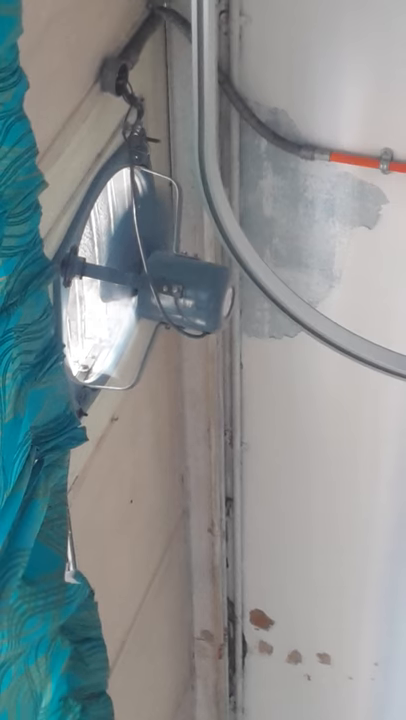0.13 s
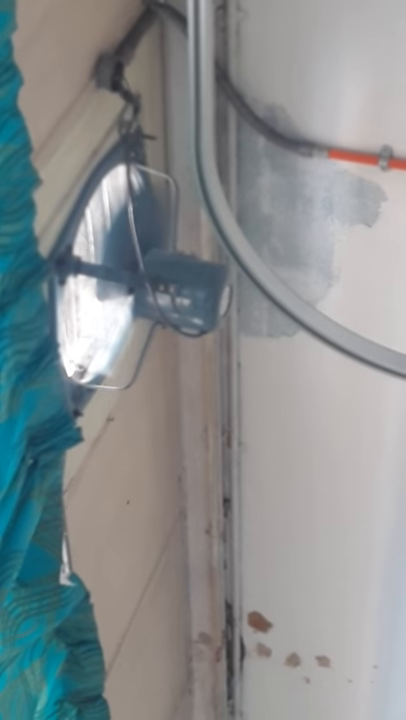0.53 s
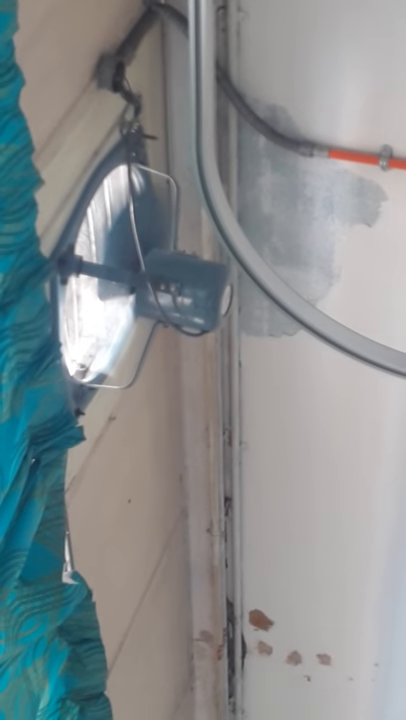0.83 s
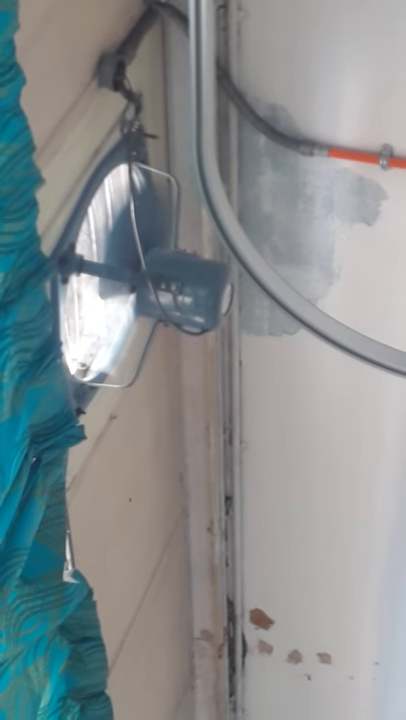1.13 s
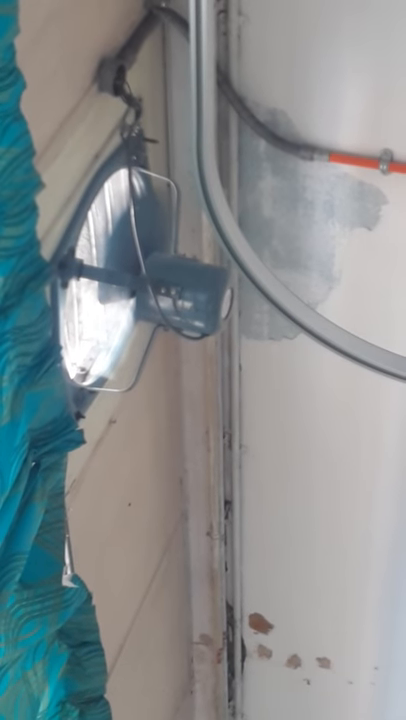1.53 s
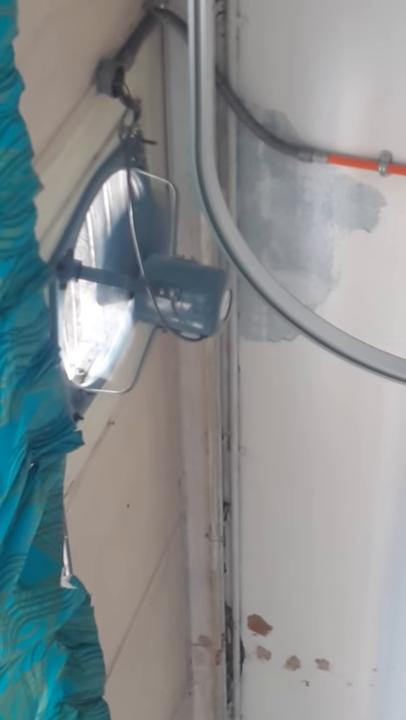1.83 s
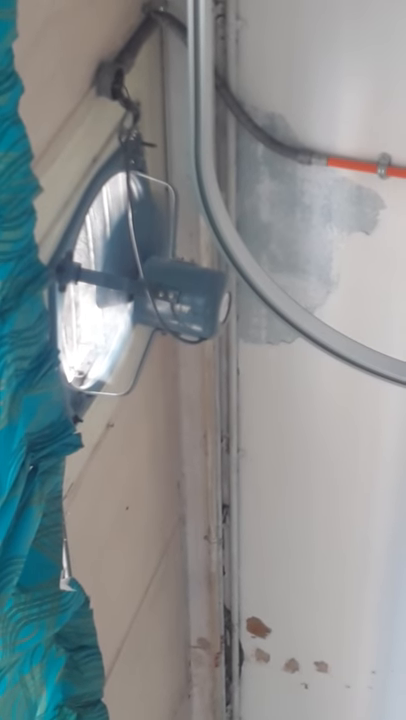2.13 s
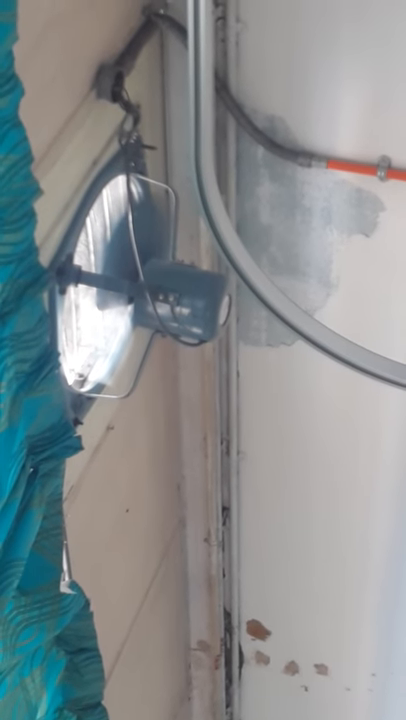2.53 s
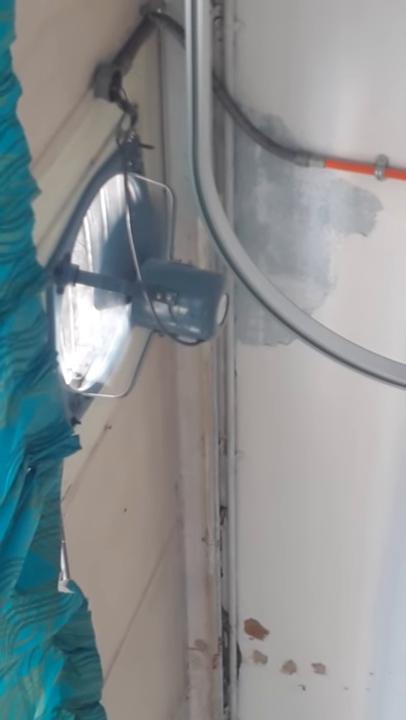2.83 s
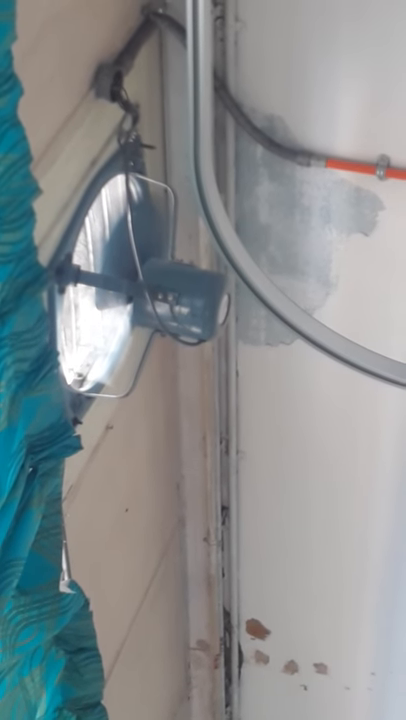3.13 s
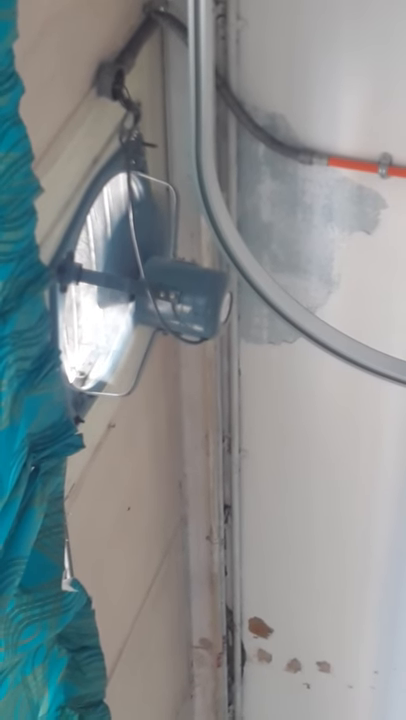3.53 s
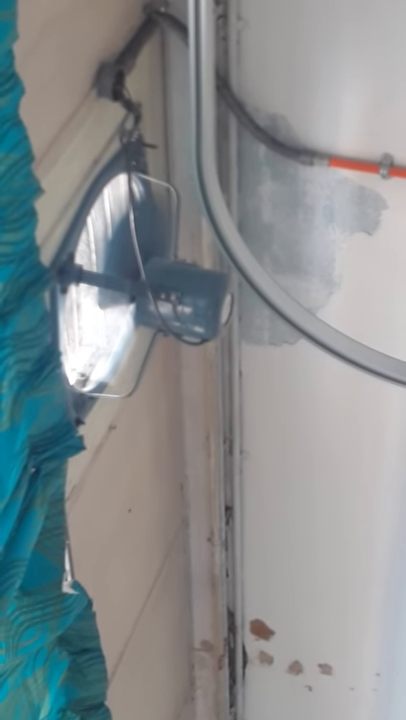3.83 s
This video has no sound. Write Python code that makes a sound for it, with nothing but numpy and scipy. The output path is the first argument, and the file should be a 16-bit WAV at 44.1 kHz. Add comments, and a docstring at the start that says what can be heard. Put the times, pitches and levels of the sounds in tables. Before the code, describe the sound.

Loud fan noise, rushing air and low hum, with fast metallic chatter and one brief knock.

```python
"""In a hard-walled room a small metal exhaust fan runs as the sound fades in: turbulent air, blade and mains
hum and a singing bearing, made of shaped noise, wavering tones and noise-driven resonances. Once a turn the
rotor scrapes and chatters against its housing, as grain under contact pressure, and the housing rings in the
treble. A hissing puff comes at 0.9 s; gusts and squeals come and go throughout. At 2.2 s one knock on the left
microphone, a filtered pressure step, makes the limiter duck."""
import sys
import numpy as np
from scipy import signal
from scipy.fft import rfft, irfft
from scipy.io import wavfile
from scipy.ndimage import uniform_filter1d, minimum_filter1d

SR = 44100
rng = np.random.default_rng(int(sys.argv[2]) if len(sys.argv) > 2 else 0)


def inscribe(sig):
    """Save sig as 16-bit PCM at rate SR to the path in sys.argv[1].

    A 1-D sig is mono; a 2-D sig holds one channel per row.
    Samples are clipped to [-1, 1] before scaling.
    """
    pcm = np.round(np.clip(np.atleast_2d(sig).T, -1, 1) * 32767)
    wavfile.write(sys.argv[1], SR, pcm.astype(np.int16))


N = 176400   # samples: 4 s

TURN_S, FIRST_TURN_S = .042137, .3299   # rotation period, start of the first scraping turn


def from_db(db):
    """Level to amplitude: 20 dB is a factor of ten."""
    return 10 ** (np.asarray(db) / 20)


def rms_one(x):
    """Normalisation to unit rms, so that a later gain sets the level."""
    return x / np.sqrt(np.mean(x ** 2) + 1e-20)


def at_hz(points, hz):
    """Interpolation on a logarithmic frequency axis."""
    point_hz, values = np.transpose(points)
    return np.interp(np.log(np.maximum(hz, 1)), np.log(point_hz), values)


def bell(x, width):
    """Gaussian hump of height 1 around zero."""
    return np.exp(-(x / width) ** 2)


def humps(rows, width_s):
    """Superposition in dB: one Gaussian swell for each row."""
    t = np.arange(N) / SR
    return sum(db * bell(t - at_s, width_s) for at_s, db in rows)


def drift(rate_hz):
    """Random wander of unit rms: low-passed noise, computed at every 40th sample and interpolated."""
    pole = np.exp(-2 * np.pi * rate_hz * 40 / SR)
    noise = rng.standard_normal(N // 40 + 2002)
    slow = signal.lfilter([1], [1, -2 * pole, pole * pole], noise)[2000:]   # drop the filter's start-up
    return np.interp(np.arange(N) / 40, np.arange(len(slow)), rms_one(slow))


def colour(x, spectrum):
    """Linear filtering: multiply by a spectrum, then normalise to rms 1."""
    gain = from_db(at_hz(spectrum, np.fft.rfftfreq(N, 1 / SR)))
    return rms_one(irfft(rfft(x) * gain, N))


def ring(drive, mode):
    """Damped resonance: a pole pair set by frequency and decay, with its own level in each channel."""
    hz, left_db, right_db, t60_s = mode
    radius = np.exp(-np.log(1000) / (t60_s * SR))   # falls 60 dB in t60
    angle = 2 * np.pi * hz / SR
    ringing = signal.lfilter([1, 0, -1], [1, -2 * radius * np.cos(angle), radius * radius], drive)
    return from_db([[left_db], [right_db]]) * rms_one(ringing)


# spectrum of the rushing air: (frequency [Hz], relative density [dB per Hz])
AIR_SPECTRUM = [(20, -30), (40, -24), (60, -10.5), (80, -12), (100, -6), (160, -4), (270, .5), (340, -4.5),
                (420, -7), (500, -3.5), (650, -6), (760, -3), (900, -7), (1020, -5), (1150, -9), (1350, -8),
                (1550, -14), (2200, -13.5), (4500, -12), (7000, -12), (11000, -20.5), (15500, -26)]
# likeness of the rush at the two ears: (frequency [Hz], left-right correlation [-1 to 1])
EAR_CORRELATION = [(40, 1), (120, 0.85), (250, 0.89), (600, 0.49), (1100, 0.2), (3000, 0.15), (12000, 0)]
# stereo balance of rush and hum: (frequency [Hz], left minus right [dB])
AIR_PAN = [(60, 0), (250, -3.5), (600, 0.5), (1200, -3), (2400, -2), (5000, 0), (13000, -8)]
# gusts in the middle of the rush: (time [s], swell [dB])
GUSTS = [(.64, 1.5), (.99, 5), (1.35, 2.5), (1.56, 2.5), (1.77, 3.5), (1.94, 3.5), (2.09, 2.5), (2.37, 4.5),
         (2.51, 6.5), (2.73, 1), (2.9, 3), (3.13, 3.5), (3.45, 1.5), (3.52, 2.5), (3.72, 3), (3.9, 2)]
GUST_WIDTH_S, LULL_DB = 0.031, -1.4   # length of a gust; level between gusts
AIR_DB, AIR_PATCHY_DB, AIR_FLUTTER_DB = -28, 1.23, 1.09   # level; spread per octave, spread in common
ROAR_HZ, ROAR_OCTAVES, ROAR_FLUTTER_DB = 885, 2, 0.6   # the middle of the rush swells most
PUFF_S, PUFF_WIDTH_S, PUFF_HZ, PUFF_OCTAVES, PUFF_DB = 0.892, .035, 4060, 1.3, 4   # one hissing puff


def air():
    """Turbulence: partly correlated noise in octave bands that flutter together and flicker on their own."""
    t, hz = np.arange(N) / SR, np.fft.rfftfreq(N, 1 / SR)
    alike = np.clip(at_hz(EAR_CORRELATION, hz), -1, 1)
    mid, side = rfft(rng.standard_normal((2, N)))
    ears = np.array([[1], [-1]])
    noise = np.sqrt(1 + alike) * mid + ears * np.sqrt(1 - alike) * side
    rush = noise * from_db(at_hz(AIR_SPECTRUM, hz) + ears * at_hz(AIR_PAN, hz) / 2)
    octave = np.round(np.log2(np.maximum(hz, 64)))
    flutter_db = AIR_FLUTTER_DB * drift(47)
    roar_db = LULL_DB + humps(GUSTS, GUST_WIDTH_S) + ROAR_FLUTTER_DB * drift(45)
    puff_db = PUFF_DB * bell(t - PUFF_S, PUFF_WIDTH_S)
    out = 0
    for k in np.unique(octave):
        roar_part_db = roar_db * bell(k - np.log2(ROAR_HZ), ROAR_OCTAVES)
        puff_part_db = puff_db * bell(k - np.log2(PUFF_HZ), PUFF_OCTAVES)
        patchy_db = AIR_PATCHY_DB * drift(12.6)
        band = irfft(rush * (octave == k), N)
        out = out + band * from_db(flutter_db + roar_part_db + puff_part_db + patchy_db)
    return from_db(AIR_DB) * rms_one(out)


# hum on or near harmonics of the turning rate: (multiple of the turning rate, level [dB])
BLADE_HUM = [(5, -48.5), (6, -42), (7, -41), (8, -42.5), (9, -42), (12, -50), (16, -49.5), (20, -46),
             (21, -55), (22.2, -49), (57, -53.5)]
MAINS_HZ, MAINS_DB = 100, -45
HUM_WAVER = 0.29   # random part relative to the steady tone, in each quadrature


def hum():
    """Periodic forcing: blade and mains tones, each wavering slightly in amplitude and phase."""
    t, out = np.arange(N) / SR, 0
    tones = [(multiple / TURN_S, db) for multiple, db in BLADE_HUM] + [(MAINS_HZ, MAINS_DB)]
    for hz, db in tones:
        waver = 1 + HUM_WAVER * (drift(4.1) + 1j * drift(4.4))
        carrier = np.exp(2j * np.pi * (hz * t + rng.random()))
        tone = rms_one(np.real(waver * carrier))
        out = out + tone * from_db(db + at_hz(AIR_PAN, hz) * np.array([[.5], [-.5]]))
    return out


# resonances of the bearing: (frequency [Hz], left level [dB], right level [dB], decay time t60 [s])
BEARING_MODES = [(6360, -43, -47, 0.049), (8600, -53, -41, 0.069), (9930, -46, -39, 0.03)]
# flares in the drive of the lowest bearing resonance: (time [s], swell [dB])
SQUEALS = [(.73, 4), (.96, 9.5), (1.75, 3), (2.14, 4), (2.39, 12), (3.12, 9)]
SQUEAL_WIDTH_S = 0.067
BEARING_WANDER_DB, BEARING_WANDER_HZ = 1.5, 8.7   # spread and rate of each resonance's own swelling


def bearing():
    """Friction-driven resonance: uneven friction keeps a few modes singing; the lowest flares now and then."""
    swells_db = [BEARING_WANDER_DB * drift(BEARING_WANDER_HZ) for _ in BEARING_MODES]
    swells_db[0] = swells_db[0] + humps(SQUEALS, SQUEAL_WIDTH_S)
    out = 0
    for swell_db, mode in zip(swells_db, BEARING_MODES):
        friction = rng.standard_normal(N) * from_db(swell_db)
        out = out + ring(friction, mode)
    return out


TURN_SPREAD_DB, TURN_JITTER_MS = .5, .05   # spread of strength and timing from turn to turn


def turn_marks():
    """Near-periodic excitation: one impulse a turn, nearly even in time and strength."""
    turns_s = np.arange(FIRST_TURN_S, N / SR, TURN_S)
    late, strong = rng.standard_normal((len(turns_s), 2)).T
    marks = np.zeros(N + SR)
    places = ((turns_s + TURN_JITTER_MS * late / 1000) * SR).astype(int)
    marks[places] = from_db(TURN_SPREAD_DB * strong)
    return marks[:N]


def pressure(contacts):
    """Energy addition over one turn: each contact starts at once and decays exponentially."""
    ms = np.arange(int(TURN_S * SR)) * 1000 / SR
    power = 0
    for at_ms, db, decay_ms in contacts:
        touch = from_db(db) * np.exp(-np.abs(ms - at_ms) / decay_ms)
        power = power + (ms >= at_ms) * touch ** 2
    return np.sqrt(power)


def even_grain(stroke, spectrum, count=15):
    """Phase iteration: noise evened in envelope and spectrum, so no stray spike or pitch stands out."""
    size = len(stroke)
    shape = from_db(at_hz(spectrum, np.fft.rfftfreq(2 * size, 1 / SR)))
    grain = stroke * rng.standard_normal(size)
    for _ in range(count):
        coloured = irfft(shape * np.exp(1j * np.angle(rfft(grain, 2 * size))))
        grain = stroke * np.cos(np.angle(signal.hilbert(coloured)))[:size]
    flat = irfft(np.exp(1j * np.angle(rfft(grain, 2 * size))))[:size]   # keep the phases, level the spectrum
    return flat * np.linalg.norm(stroke) / np.linalg.norm(flat)


# contacts within every turn: (delay [ms], level [dB], decay constant [ms])
CONTACTS = [(-0.73, -1, .9), (0.5, -3, 0.8), (1.0, -1, 1.5), (2.5, -3, 1.9), (5.5, -1, 1.4),
            (7.0, -11.5, 1.8), (11, -14, 2.2)]
# dry scrape of the contacts in each channel: (frequency [Hz], relative density [dB per Hz])
SCRAPE_LEFT = [(2000, -19.5), (4500, -12), (6500, -1.5), (8000, 2.5), (9000, -6), (10000, -8.5),
               (10700, -21), (12500, -28), (13800, -22.5), (15500, -28)]
SCRAPE_RIGHT = [(2000, -23), (4500, -11), (6500, -8), (8000, -2), (9000, 0), (10000, 3), (10700, -8),
                (12500, -13.5), (13300, -11.5), (14500, -15.5), (15500, -21)]
# rms level of the dry scrape: (left [dB], right [dB])
SCRAPE_DB = (-31.5, -26.5)
# ringing of the housing: (frequency [Hz], left level [dB], right level [dB], decay time t60 [s])
HOUSING_MODES = [(6225, -44.5, -52, 0.021), (6490, -46, -42, 0.068), (7050, -43, -53, 0.032),
                 (7280, -36.5, -51, 0.014), (7540, -52, -58, 0.03), (8110, -40.5, -33.5, 0.047),
                 (8360, -57, -43, 0.051), (9220, -61, -33.5, 0.024), (9440, -59, -40.5, 0.044),
                 (9610, -60, -38, 0.032), (9840, -56, -39.5, 0.031), (10090, -65, -37, 0.029),
                 (10960, -60, -53, 0.027), (11300, -58, -40, 0.021), (11740, -56, -40, 0.037)]
FRESH_POWER = 0.091   # new rubbing noise at the contacts, as a power ratio to the repeating grain
RUB_AT_MS, RUB_DB, RUB_DECAY_MS = 25.7, -12, 6.2   # a softer rub later in the turn


def rattle():
    """Periodic impact and friction: the same rough spots repeat every turn; only the rubbing is new."""
    marks, stroke = turn_marks(), pressure(CONTACTS)
    late_rub = pressure([(RUB_AT_MS, RUB_DB, RUB_DECAY_MS)])
    rubbing = signal.oaconvolve(marks, late_rub + np.sqrt(FRESH_POWER) * stroke)[:N]

    def friction(spectrum):
        """Repetition plus randomness: the grain of the struck spots and fresh rubbing noise."""
        repeating = signal.oaconvolve(marks, even_grain(stroke, spectrum))[:N]
        return repeating + rubbing * rng.standard_normal(N)

    channels = zip(SCRAPE_DB, (SCRAPE_LEFT, SCRAPE_RIGHT))
    scrape = np.array([from_db(db) * colour(friction(spectrum), spectrum) for db, spectrum in channels])
    ringing = sum(ring(friction(SCRAPE_RIGHT), mode) for mode in HOUSING_MODES)
    return scrape + ringing


ROOM_T60_S, ROOM_DB, ROOM_DELAY_S = 0.69, -4.5, 0.0096


def room(x):
    """Diffuse reverberation: convolution with decaying noise, independent at each ear."""
    t = np.arange(SR // 2) / SR
    decay = np.exp(-np.log(1000) * t / ROOM_T60_S) * (t > ROOM_DELAY_S)
    tail = rng.standard_normal((2, len(t))) * decay
    tail /= np.sqrt(np.sum(tail ** 2, axis=1, keepdims=True))   # unit energy
    return x + from_db(ROOM_DB) * signal.fftconvolve(x, tail, axes=1)[:, :N]


KNOCK_S, KNOCK_DECAY_S = 2.2002, 0.0011
KNOCK_DB, KNOCK_LOW_HZ, KNOCK_HIGH_HZ = 4, 120, 12000   # gain and pass band


def knock():
    """Step response: a pressure step on the left microphone swings back through its bass roll-off."""
    t = np.arange(N) / SR - KNOCK_S
    step = (t >= 0) * np.exp(-np.abs(t) / KNOCK_DECAY_S) + 1e-18
    microphone = signal.butter(2, [KNOCK_LOW_HZ, KNOCK_HIGH_HZ], "band", fs=SR, output="sos")
    thump = signal.sosfilt(microphone, step)
    return from_db(KNOCK_DB) * thump * np.array([[1], [0]])   # left only


# overall level, with the sound fading in at the start: (time [s], level [dB])
LEVEL = [(0, -100), (.364, -72), (.376, -23), (0.449, -10.5), (.6, -0.5), (.88, 0.4), (1.1, 0), (2.13, 0),
         (2.22, -1.5), (2.36, -0.5), (2.52, -2.5), (2.97, -2), (3.15, -0.5), (3.5, 0.4), (4, -0.2)]
# shared slow level of rush and hum: (time [s], level [dB])
RUSH_AND_HUM_LEVEL = [(.7, 0.64), (1.4, 0), (2.15, .5), (2.44, -0.55), (2.7, 0.85), (3.02, -0.4), (3.12, 0),
                      (3.9, 0.54)]


def scene():
    """Superposition: the fan in its room under one level curve, hum and rush sharing a slow one, and the knock."""
    t = np.arange(N) / SR
    level = from_db(np.interp(t, *np.transpose(LEVEL)))
    shared_level = from_db(np.interp(t, *np.transpose(RUSH_AND_HUM_LEVEL)))
    metal = room(rattle() + bearing())
    return level * (metal + shared_level * (hum() + air())) + knock()


LIMIT_DB, RELEASE_DB_PER_S, HOLD_S, LOOK_AHEAD_S = -1.5, 600, 0.017, 0.0033
STOP_HZ = 16200   # start of the low-pass filter's stop band


def record(dry):
    """Gain control: a look-ahead limiter ducks both channels on a peak, holds and recovers; the top is cut."""
    t = np.arange(N) / SR
    over_db = np.maximum(20 * np.log10(np.abs(dry).max(axis=0) + 1e-9) - LIMIT_DB, 0)
    half_hold, ahead = int(HOLD_S * SR / 2), int(LOOK_AHEAD_S * SR)
    held_db = -minimum_filter1d(-over_db, 2 * half_hold + 1)   # running maximum
    held_db = np.roll(held_db, half_hold - ahead)   # begins ahead of the peak
    # recovery at a constant rate in dB
    duck_db = np.maximum.accumulate(held_db + RELEASE_DB_PER_S * t) - RELEASE_DB_PER_S * t
    limited = dry * from_db(-uniform_filter1d(duck_db, ahead + 1))
    low_pass = signal.cheby2(16, 70, STOP_HZ, fs=SR, output="sos")
    return signal.sosfilt(low_pass, limited)


dry = scene()
out = record(dry)
inscribe(out)
```